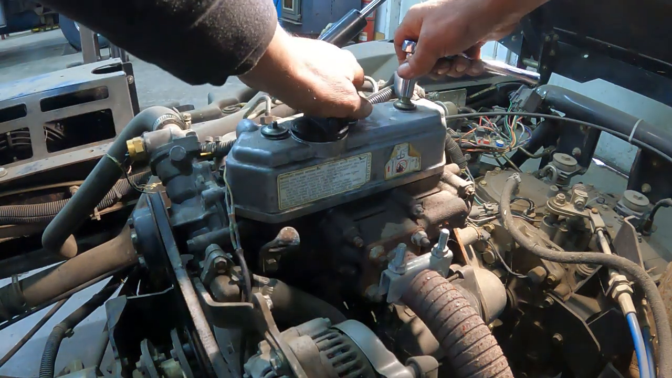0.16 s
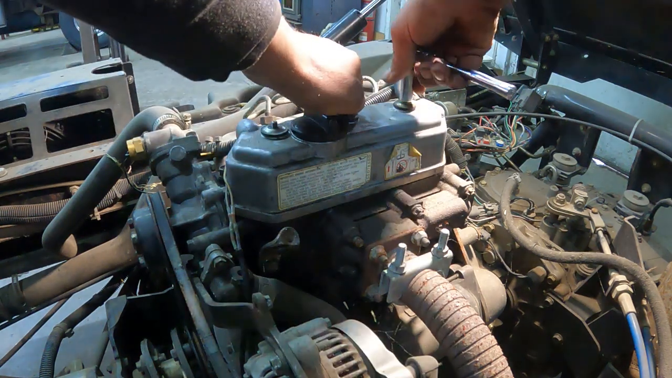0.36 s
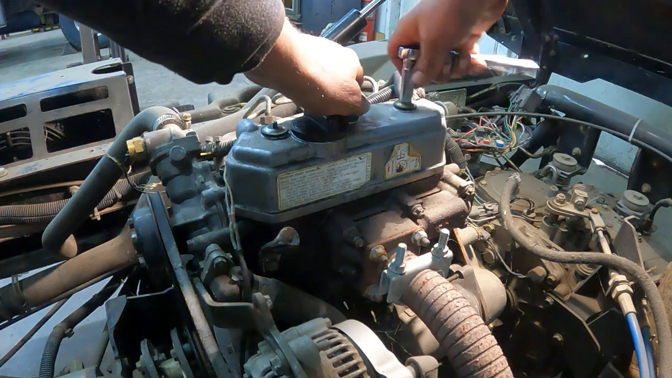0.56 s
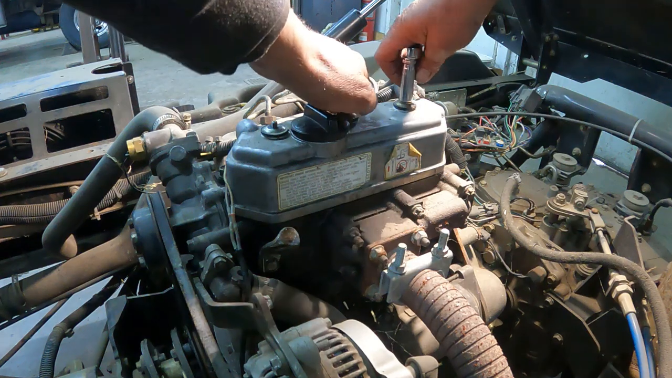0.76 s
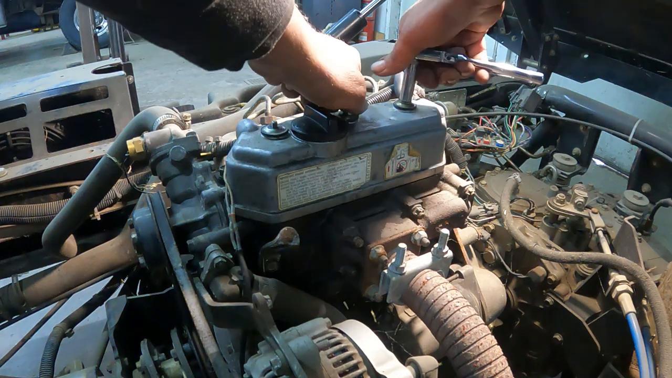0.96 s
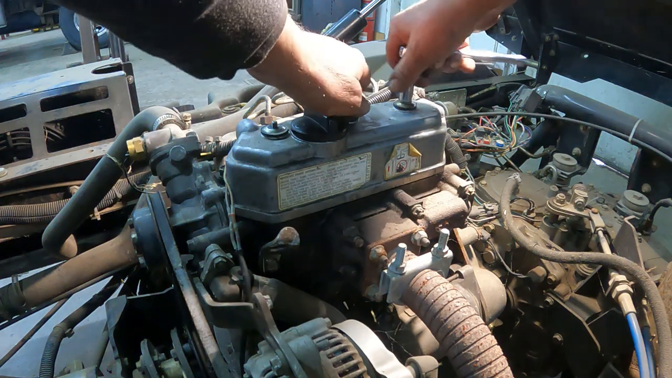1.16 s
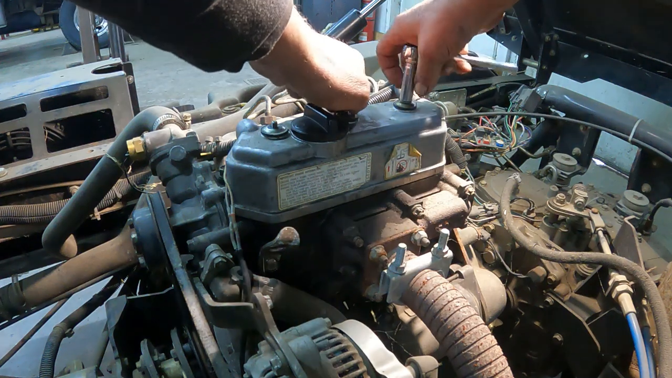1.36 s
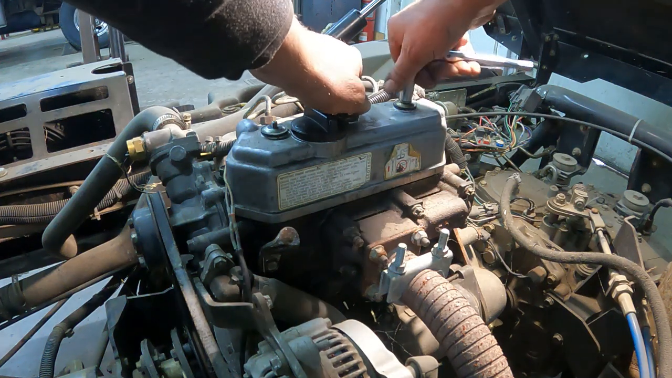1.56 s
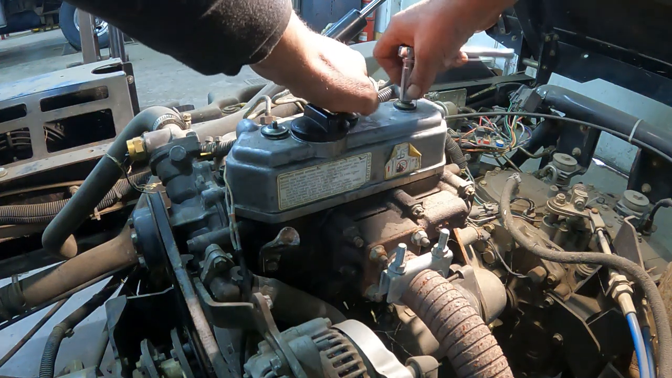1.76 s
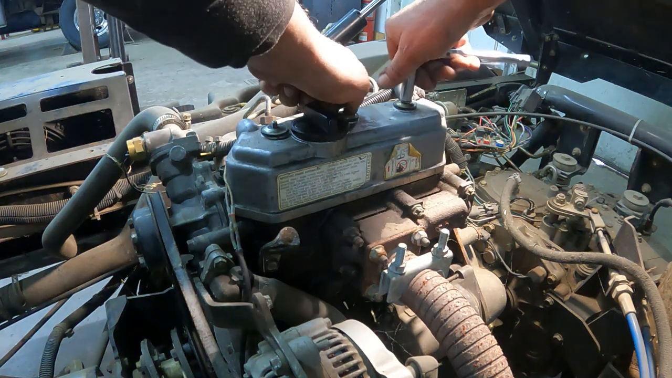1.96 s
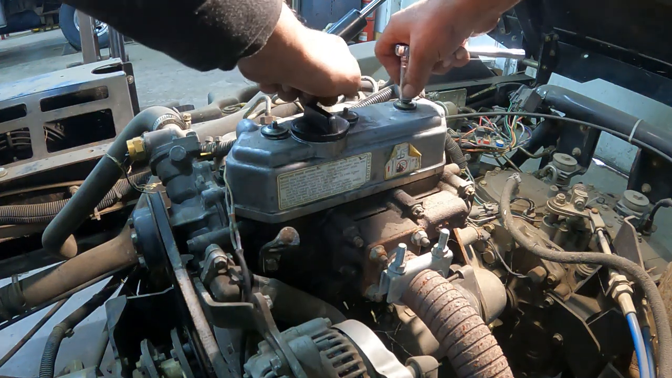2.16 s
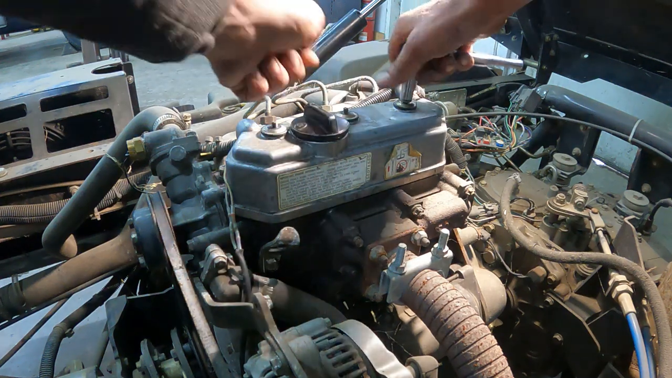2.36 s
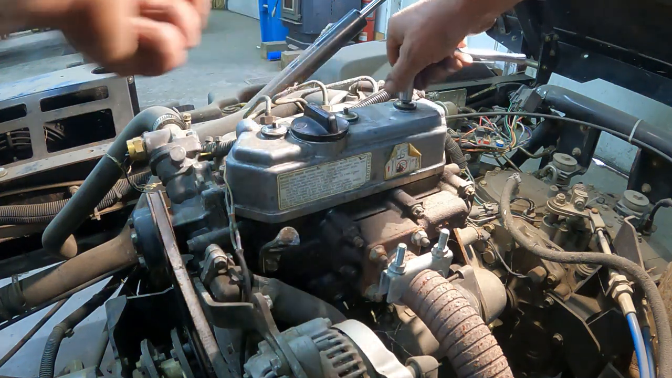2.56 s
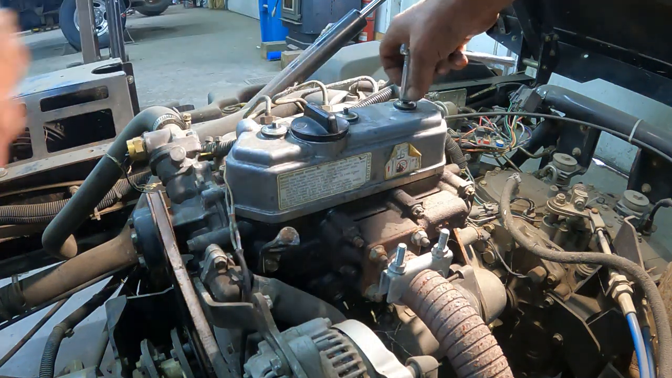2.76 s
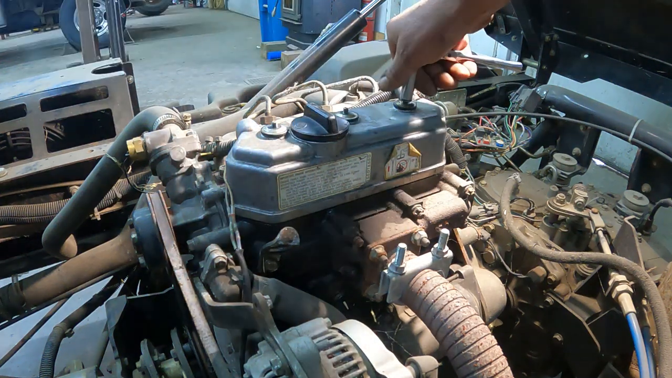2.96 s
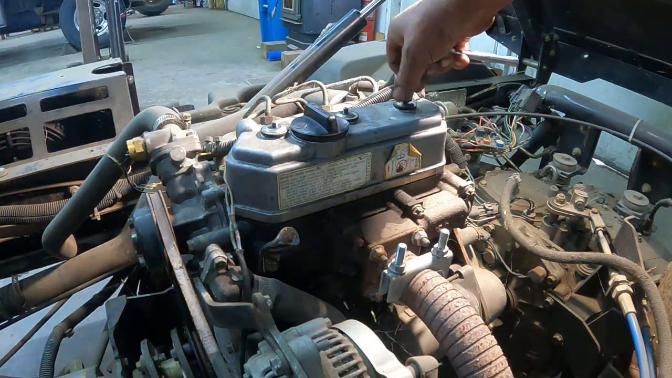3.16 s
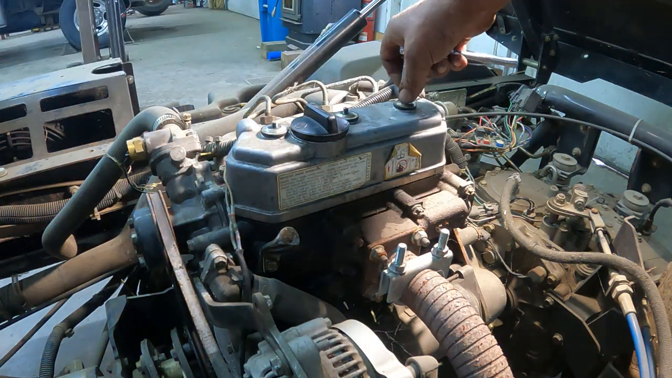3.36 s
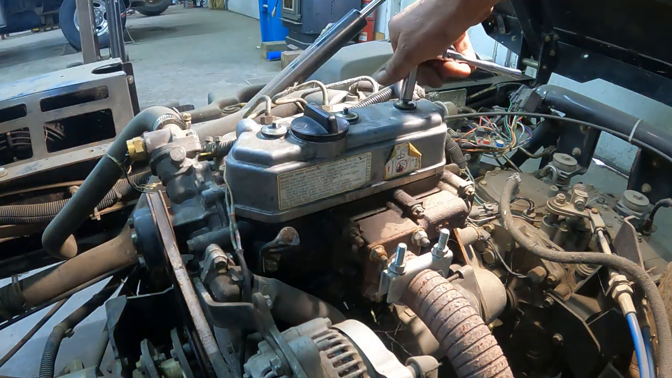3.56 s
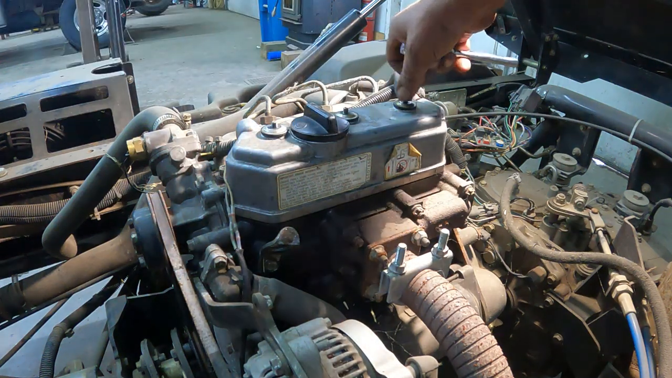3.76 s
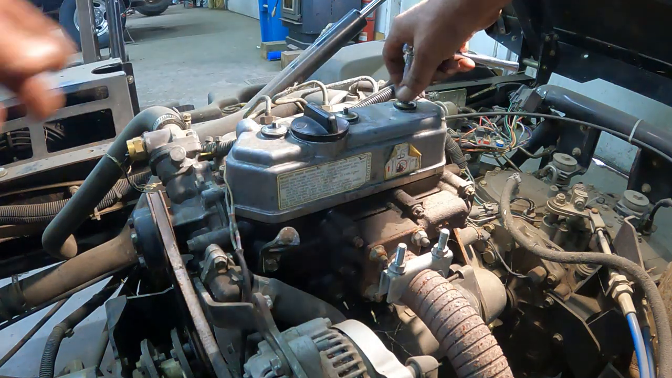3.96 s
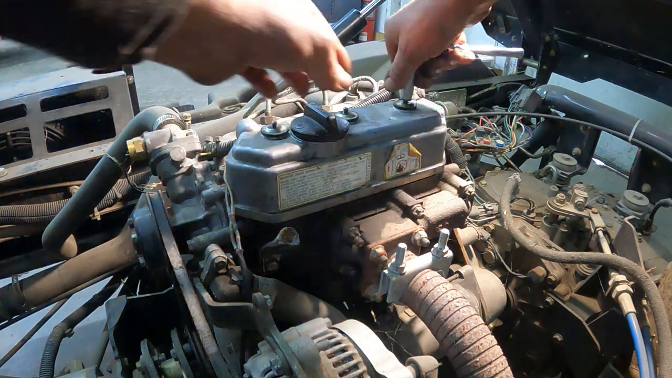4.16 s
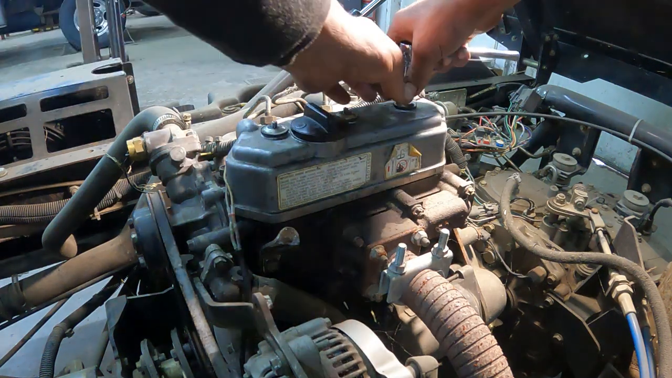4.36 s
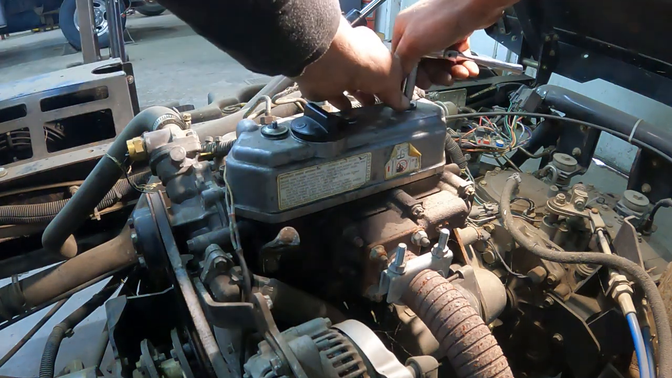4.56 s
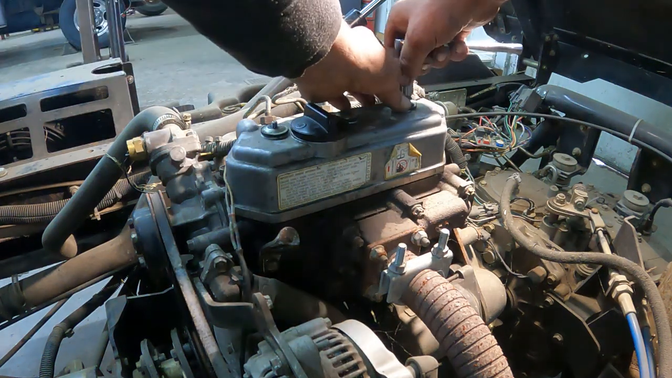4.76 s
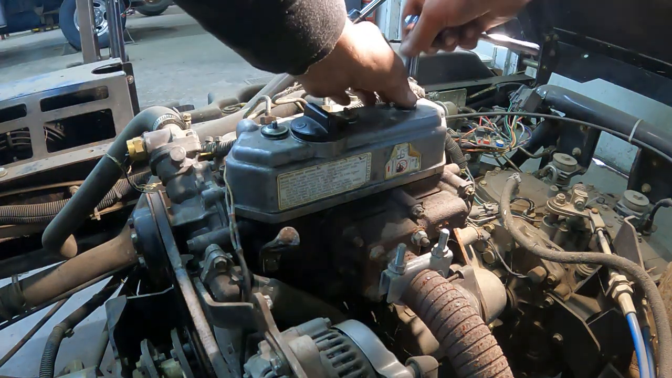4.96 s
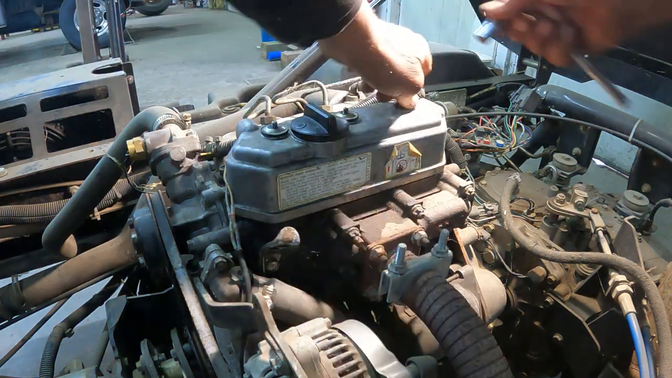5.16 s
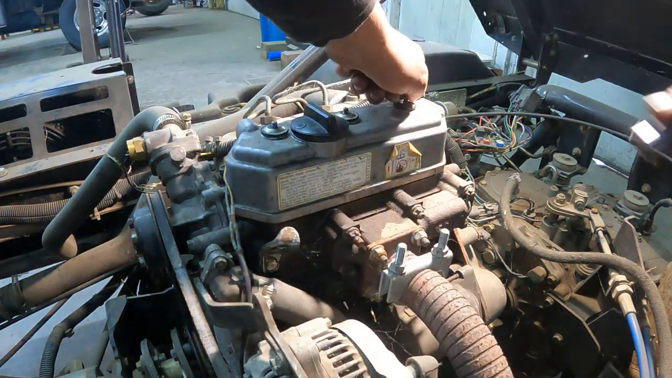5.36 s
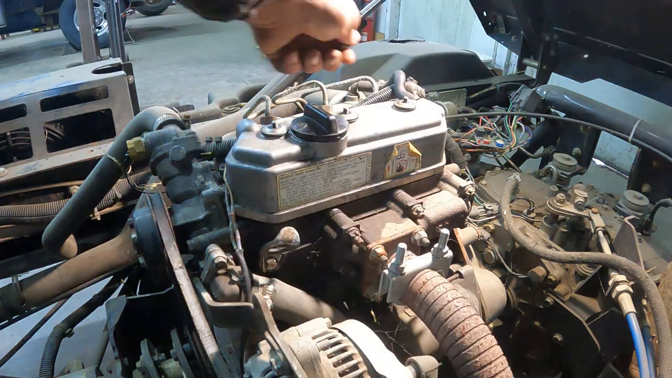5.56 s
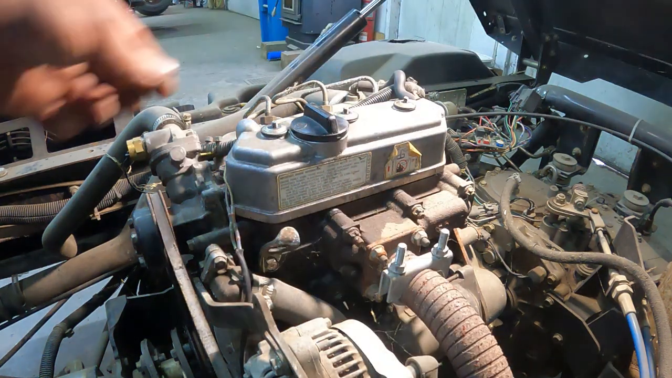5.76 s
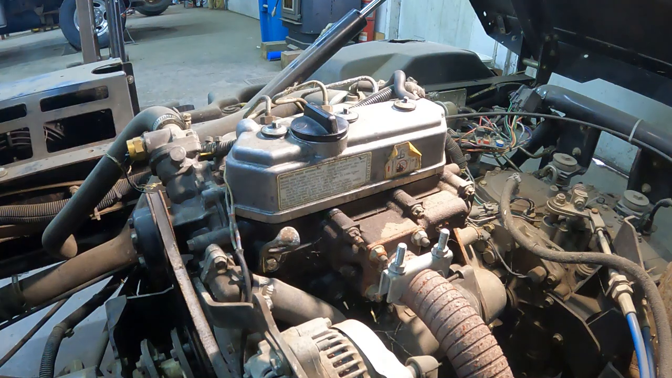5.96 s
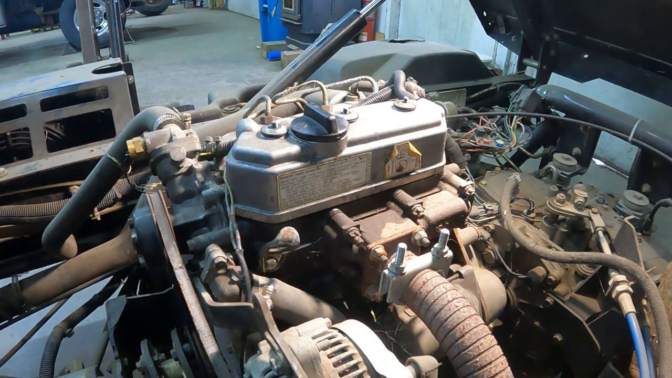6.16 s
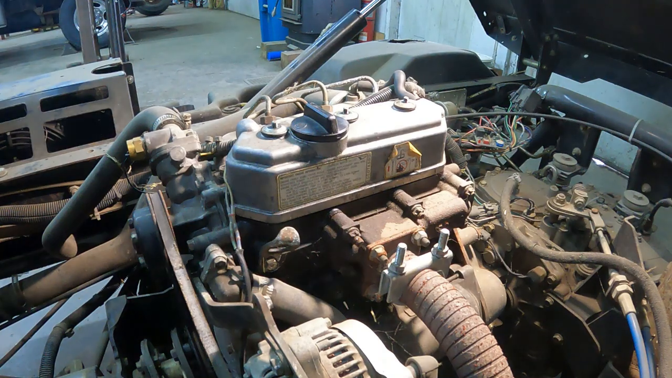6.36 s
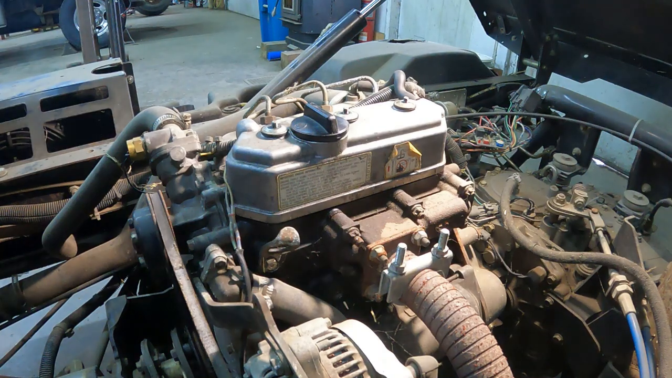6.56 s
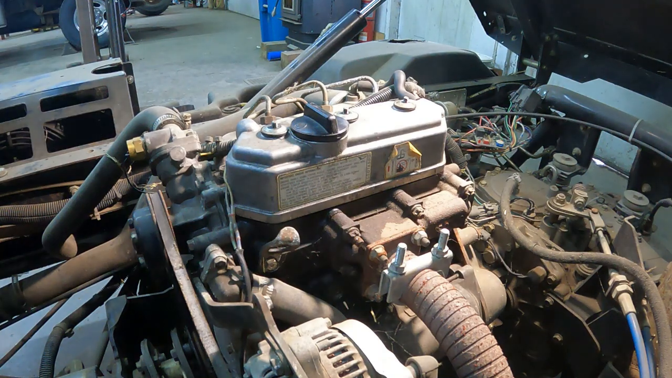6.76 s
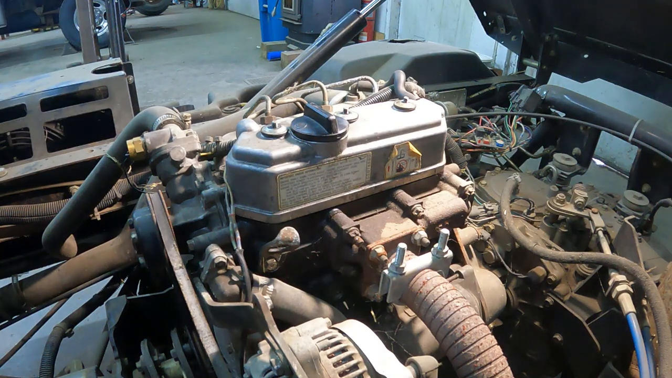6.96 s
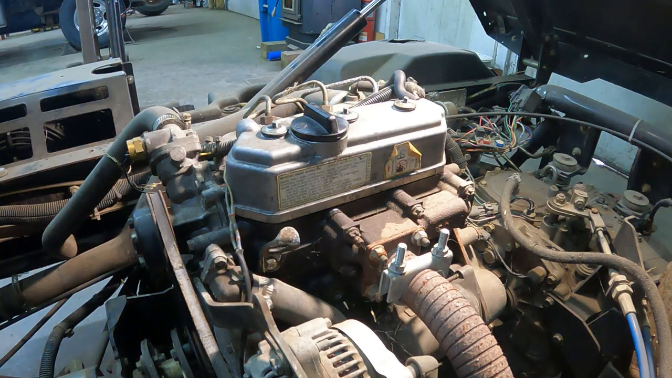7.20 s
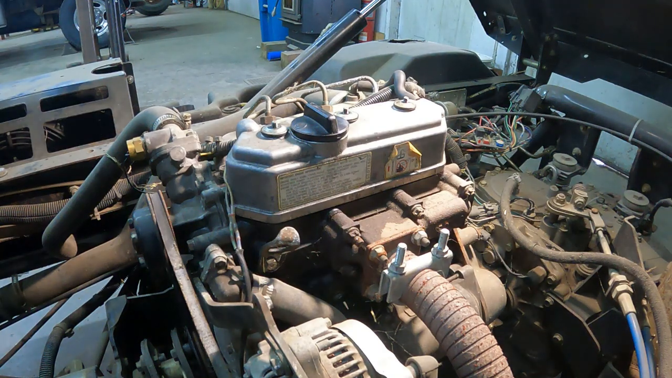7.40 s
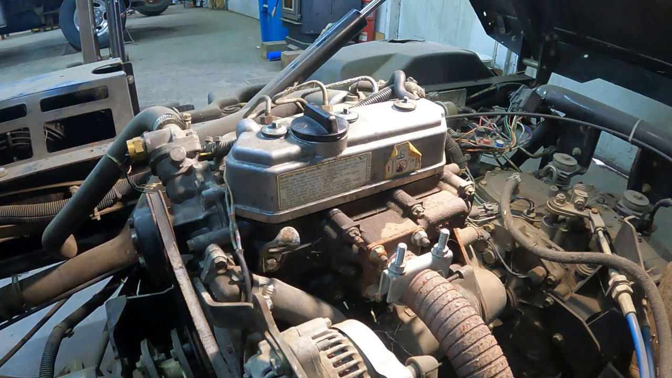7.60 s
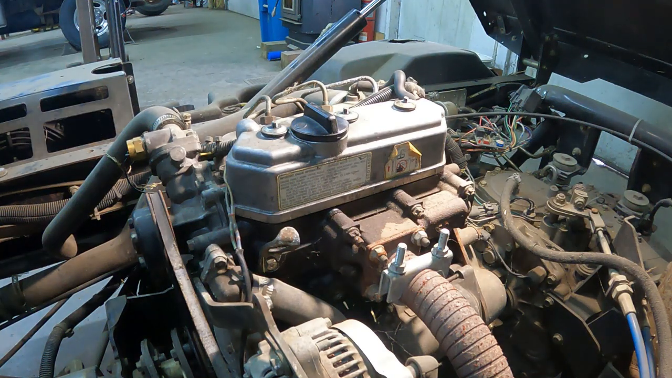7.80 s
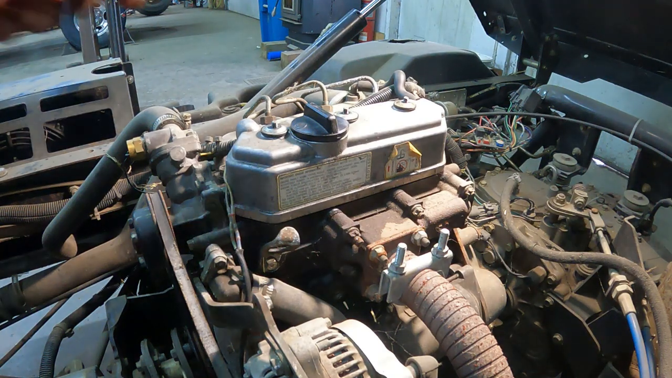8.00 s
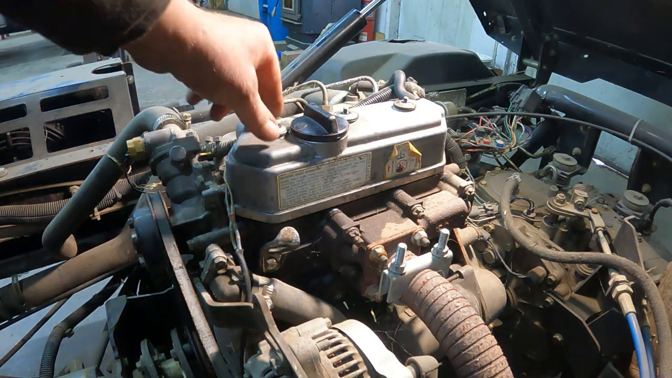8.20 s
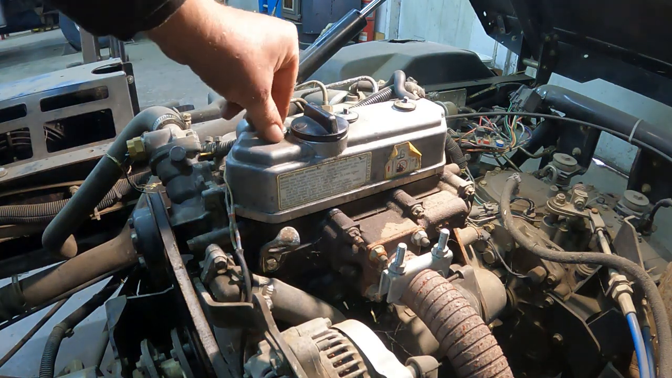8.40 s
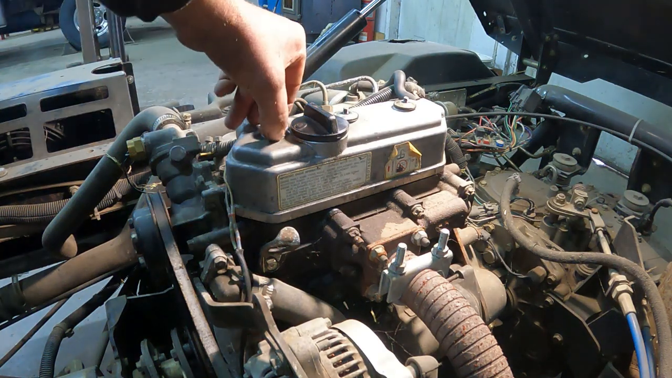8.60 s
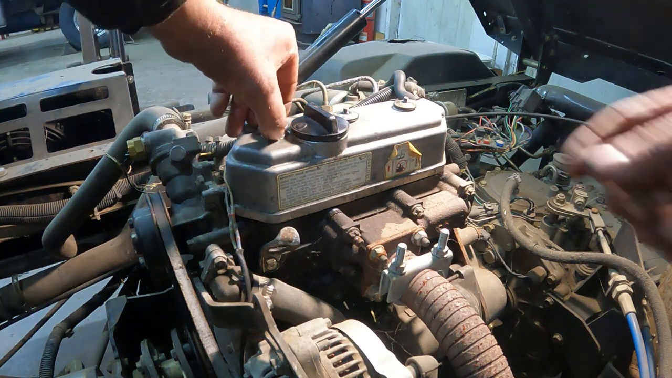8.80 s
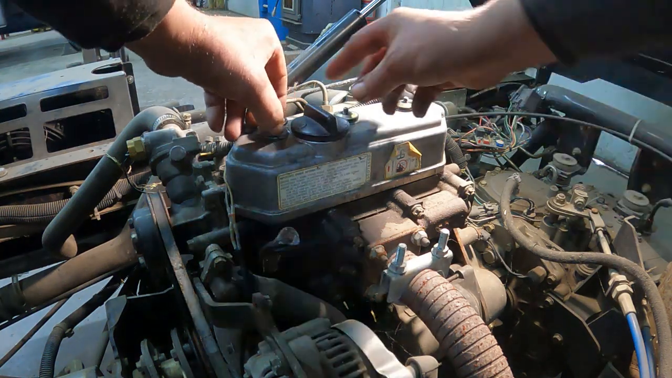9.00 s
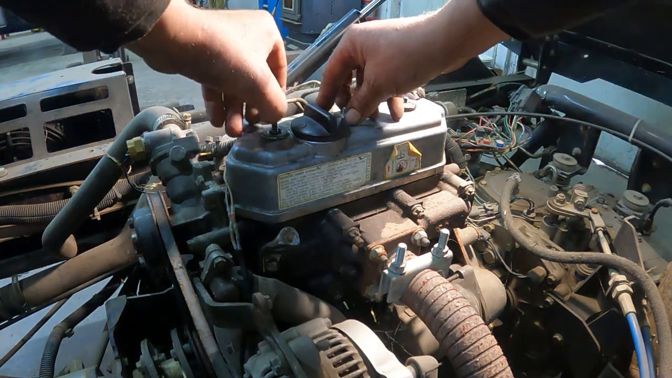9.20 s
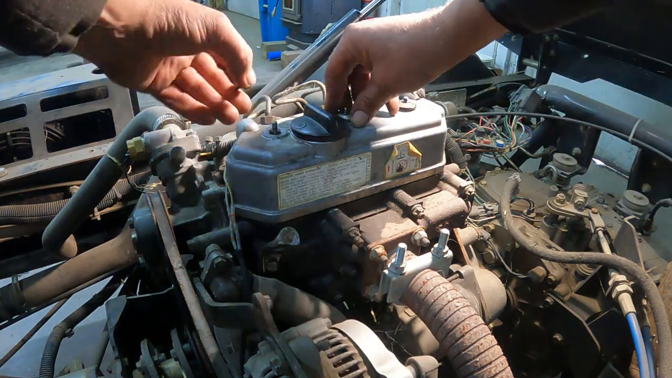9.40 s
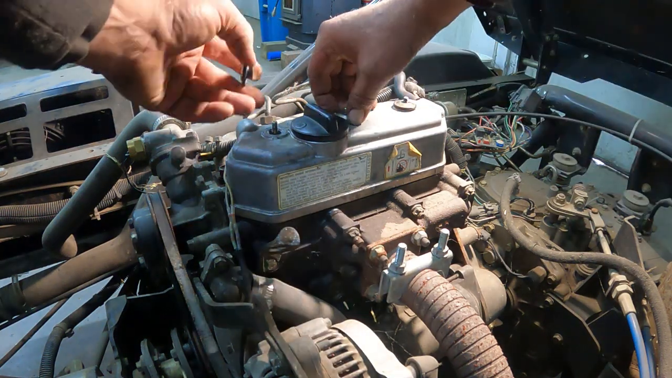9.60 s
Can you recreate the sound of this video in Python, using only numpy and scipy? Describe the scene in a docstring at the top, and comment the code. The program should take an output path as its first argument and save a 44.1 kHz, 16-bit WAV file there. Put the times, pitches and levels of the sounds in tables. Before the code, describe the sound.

A ratchet wrench clicks in quick dry bursts close by, then tools clank on metal and a hollow box thuds twice in a garage.

```python
"""Faint ticks of hands and parts come first, over a low wavering rumble and a thin hiss in a garage.
Then a ratchet wrench is swung back in quick strokes over a small engine; its pawl snaps tooth by tooth.
Further off, tools are laid on metal and a heavy thing bumps a hollow box twice. Snaps, ticks, scrapes and
rattles are shaped noise, steel and box ring as decaying sines, the background is filtered noise.
One close microphone feeds both channels."""
import sys
import numpy as np
from scipy import signal
from scipy.fft import rfft, irfft
from scipy.io import wavfile
from scipy.ndimage import uniform_filter1d

SR = 44100
rng = np.random.default_rng(int(sys.argv[2]) if len(sys.argv) > 2 else 0)


def output_pcm(signal):
    """Save a mono or channel-first signal as 16-bit PCM at the path in sys.argv[1].

    Samples are clipped to [-1, 1] before scaling.
    """
    pcm = np.clip(np.atleast_2d(signal).T, -1, 1) * 32767
    wavfile.write(sys.argv[1], SR, np.round(pcm).astype(np.int16))


N = 425124
T = np.arange(N) / SR  # s

# Spectra below have the columns: freq_hz [Hz], level_db [relative dB per Hz]; only their shape counts.
# Modes have: freq_hz [Hz], level_db [relative dB], t60_s [s]; each blow scatters pitch and level.

# low background: start_s [s], rumble_db [dB rms], hum_db [dB rms]
RUMBLE_LEVELS = [(0.0, -38, -35), (0.4, -49, -38.5), (0.85, -35.5, -45.5), (1.3, -43.5, -46.5),
                 (1.65, -38.5, -45.5), (2.1, -51.5, -50), (2.4, -44, -46.5), (2.9, -48, -50.5),
                 (3.4, -43, -48), (4.1, -46.5, -48), (4.62, -43.5, -49.5), (5.3, -49.5, -49),
                 (6.5, -55, -49), (7.3, -52, -51), (8.2, -57.5, -52), (9.64, -47.5, -51)]
# thin background: start_s [s], murmur_db [dB rms], hiss_db [dB rms], both before their flicker
AIR_LEVELS = [(0, -53, -69), (.6, -57.5, -65), (1.5, -61.5, -70), (3, -62, -70), (4, -61.5, -61),
              (5, -67, -72), (6.4, -60.5, -69.5), (7.3, -64.5, -72), (7.9, -64.5, -64.5), (8.3, -65, -70.5),
              (9, -64, -66.5), (9.64, -69, -70.5)]
# spectra of the low background: freq_hz [Hz], level_db [relative dB per Hz]
DEEP_COLOUR = [(6, -15.5), (13, 15.5), (26, 8), (33, 8.5), (39, 19), (45, 5.5), (52, 2.5), (70, -56), (400, -110)]
HUM_COLOUR = [(30, -46), (46, -0.5), (62, 4.5), (85, -2), (100, -7.5), (120, -17.5), (160, -48), (900, -110)]
DRONE_COLOUR = [(80, -27), (115, 6.5), (150, -4.5), (250, -9), (400, -27), (2000, -100.5)]
# spectra of the murmur, the hiss and its steady top: freq_hz [Hz], level_db [relative dB per Hz]
MURMUR_COLOUR = [(200, -17.5), (300, 5), (450, 2), (800, -1), (1250, -2), (1350, 2), (1450, -3.5),
                 (2500, -10.5), (4500, -20.5), (12000, -43.5)]
HISS_COLOUR = [(800, -32.5), (2000, 5.5), (4000, 5), (6500, 3.5), (7000, 7), (7500, 3), (9500, -0.5),
               (10500, -5), (15900, -38.5)]
FIZZ_COLOUR = [(3000, -20.5), (8000, -2.5), (11000, 0.5), (15500, 0.5), (15950, -39)]
# a faint dull rush that swells and fades: middle_s [s], half_width_s [s], level_db [dB rms at the middle]
RUSH_SWELL = (5.82, 0.38, -64)
# spectrum of the rush: freq_hz [Hz], level_db [relative dB per Hz]
RUSH_SPECTRUM = [(200, -43), (900, -1.5), (1500, 2), (2400, -3), (4000, -14), (10000, -52)]
DRONE_DB = -11  # dB relative to the hum, which the drone follows
FIZZ_DB = -75.5  # dB rms

# the stand rocks after the bump: start_s [s], end_s [s], pitch_hz [Hz], level_db [dB peak]
STAND_SWAY = (7.72, 8.05, 26.2, -36.5)
# decay of the garage: freq_hz [Hz], t60_s [s]
ROOM_DECAY = [(150, 1), (600, 1), (2000, 1), (6000, 0.56), (14000, .3)]

# short scrapes of fingers and parts: start_s [s], peak_db [dB], centre_hz [Hz], width_octaves [octaves]
SCRAPE_EVENTS = [(7.994, -44.5, 3130, 0.92), (8.074, -38.5, 2880, 1.1), (8.076, -39.5, 220.4, 1),
                 (8.403, -52, 6560, 1.1), (9.176, -50, 4000, 1.9), (9.239, -49.5, 694, 0.77),
                 (9.272, -57, 2600, 0.45), (9.438, -57.5, 4700, .1), (9.524, -53.5, 4540, 0.14),
                 (9.524, -47, 1500, 2.5)]
SCRAPE_S = 0.038  # length in s
# faint ticks of hands, nuts and sockets: start_s [s], peak_db [dB], centre_hz [Hz], width_octaves [octaves]
TICK_EVENTS = [(0.0429, -21, 4450, 0.89), (0.0842, -29.5, 1540, 1.84), (0.096, -33, 1480, 1.9),
               (0.2085, -35, 5360, 1.3), (0.313, -35.5, 2940, 1.3), (0.336, -37.5, 4000, 1.1),
               (0.554, -32.5, 1280, 2.3), (0.5762, -41, 3000, 1.7), (.67, -44, 1100, 0.46),
               (1.8434, -44, 5000, 1.3), (1.9867, -33, 3950, 1.8), (2.4264, -38.5, 5500, 1.2),
               (2.631, -40, 6100, 2.1), (3.74, -48, 6300, 1.1), (4.7545, -45.5, 6000, 1.2),
               (5.3263, -47, 1130, 1.1), (5.3414, -37, 4920, 1.3), (6.91, -45, 5700, 0.74),
               (7.192, -50, 2540, 0.71), (8.6885, -41.5, 8600, 0.28), (8.686, -36, 350, 0.97),
               (8.687, -44.5, 2470, 1.5), (8.735, -46, 8300, 0.47), (9.1963, -46, 4340, 0.72),
               (9.28, -52, 5940, 1.2)]
TICK_T60_S = 0.084

# blows of tools laid on metal, then of the box: time_s [s], peak_db [dB], held_s [s], rattle_t60_s [s]
SOCKET_BLOWS = [(3.549, -12.5, 0.017, 0.16), (3.569, -16, 0.011, 0.12), (3.626, -29.5, .004, 0.049)]
WRENCH_BLOWS = [(6.377, -15, 0.0034, 0.13), (6.382, -10, 0.021, 0.11)]
BOX_BLOWS = [(7.624, -12, 0.021, 0.072), (7.700, -4, 0.0059, 0.14)]
# ringing modes that the blows drive: freq_hz [Hz], level_db [relative dB], t60_s [s]
SOCKET_RING = [(287, -14, .28), (572, -7, .5), (846, -12, 0.25), (1024, -3, .24), (1327, -4, 0.17),
               (1590, 8.5, 0.066), (1765, -14, 0.23), (1997, -13, 0.46), (2350, -16, .15), (2658, -4, 0.12),
               (3225, -10, .15), (5443, -12, .06), (5970, -8, 0.04)]
WRENCH_RING = [(295, -36.5, 0.28), (428, -22, 1.4), (573, -10, 0.8), (600, -15, 0.5), (615, -17, 0.3),
               (1027, 5, 0.19), (1482, -2.5, 0.17), (1654, 3, 0.12), (1794, 12, 0.052), (2210, -0.5, 0.094),
               (2550, -12, .15), (2860, -9.5, 0.29), (3200, -3, 0.14), (3800, -18, .2), (3850, 3, 0.14),
               (4745, 2, 0.15), (6260, -24, .25)]
BOX_RING = [(171, -12, 0.17), (209, -19.5, 0.47), (284, -15.5, 0.29), (351, -16, 0.26), (414, 0, 0.13),
            (528, -15, 0.29), (586, -9.5, 0.16), (710, -5.5, 0.24), (792, -2.5, 0.064), (890, 2, 0.17),
            (1240, -10, 0.27), (1398, -7.5, 0.13), (1712, -30, .2), (2400, -24.5, .08)]
# spectra of the rattling contact: freq_hz [Hz], level_db [relative dB per Hz]
SOCKET_RATTLE = [(120, -59), (200, -33.5), (1000, -1.5), (1230, -14), (1530, -6), (2250, -14.5), (2610, -8),
                 (4120, -19.5), (5520, -14), (16000, -34.5)]
WRENCH_RATTLE = [(120, -55), (200, -31), (601, -11), (883, -12.5), (1020, -15), (1160, -11), (2090, -7.5),
                 (3490, -17.5), (3970, -9), (16000, -30.5)]
BOX_RATTLE = [(59, -64), (130, -41.5), (170, -19), (260, -14.5), (383, -3), (630, -2), (1100, -11),
              (1380, -11), (2090, -18), (2410, -17), (2620, -23), (5300, -34.5), (14000, -61.5)]

# back swings of the handle: first_tooth_s [s], last_tooth_s [s], teeth [count], peak_db [dB at top speed,
# before scatter], ring_db [relative dB, before scatter], start_speed [share of top], speeds_up_at [share
# of the swing], fastest_at [share of the swing], end_speed [share of top]
BACK_SWINGS = [(0.9246, 1.024, 5, -17.5, -10, .75, .01, .22, .44),
               (1.2314, 1.3883, 16, -14.5, -2, .47, .12, .26, .18),
               (1.6713, 1.7922, 16, -14.5, -8, .31, .09, .49, .21),
               (2.119, 2.2392, 16, -14, -6, .49, .41, .58, .73),
               (2.652, 2.7367, 13, -14, -5, .48, .4, .86, .39),
               (3.1879, 3.2922, 12, -15, -6, .43, .14, .85, .51),
               (3.7943, 3.9005, 13, -14.5, -3, .42, .42, .57, .74),
               (4.2681, 4.3368, 12, -13, -3, .72, .69, .73, .11),
               (4.774, 4.8582, 11, -12, -2, .52, .45, .82, .51)]
# teeth as the hand hesitates before or after a swing: time_s [s], peak_db [dB], ring_db [relative dB]
SINGLE_TEETH = [(0.4104, -17.5, -5), (0.449, -18.5, -1.5), (1.4969, -23, -25), (2.096, -18.5, -18),
                (2.2536, -19.5, -12), (2.763, -19, -6), (3.1188, -18.5, -8.5), (3.3488, -16.5, -3),
                (3.7503, -17.5, -5.5), (3.7855, -16, -17), (3.9638, -19.5, -10), (4.248, -18, -19),
                (4.8854, -12.5, 12)]
# spectrum of the pawl's snap: freq_hz [Hz], level_db [relative dB per Hz]
SNAP_COLOUR = [(250, -32.5), (400, -21), (1040, -23), (1500, -27), (2300, -14), (3200, -11), (4900, -10.5),
               (7000, -6), (9200, -7.5), (10300, -13), (12200, -5), (15500, -9), (15950, -34), (17000, -52)]
# modes of the steel ratchet head: freq_hz [Hz], level_db [relative dB], t60_s [s]
HEAD_MODES = [(7630, -24, 0.012), (8126, 1, 0.013), (8290, 1.5, 0.025), (8430, -10, 0.0099),
              (12290, 0, 0.0085), (12700, -8, .007), (15400, -6, 0.011), (4070, -18, 0.028),
              (3090, -22.5, 0.035), (3310, -16, 0.036), (7040, -27.5, 0.032)]
TOOTH_SCATTER_DB, RING_SCATTER_DB = 1.6, 2.5  # standard deviation from tooth to tooth
SLOW_DB = -3.5  # change of a tooth's level towards standstill

TOP_HZ = 16900  # upper limit of the recorder


def amp(db):
    """Converts dB to a linear factor."""
    return 10 ** (np.asarray(db, float) / 20)


def fade(t60, length):
    """Exponential decay that is 60 dB down after t60 seconds (2 ms at least)."""
    return np.exp(-np.log(1000) * np.arange(length) / SR / max(t60, .002))


def colour(points, size=1024):
    """Causal minimum-phase filter response with the given spectrum, unit energy."""
    hz, db = np.transpose(points)
    grid_hz = np.arange(size + 1) * SR / 2 / size + 1
    log_gain = np.log(amp(np.interp(np.log(grid_hz), np.log(hz), db)))
    # folding the cepstrum onto positive times makes the response causal
    cepstrum = irfft(log_gain)
    cepstrum[1:size] *= 2
    cepstrum[size + 1:] = 0
    response = irfft(np.exp(rfft(cepstrum)))[:size]
    response *= np.hanning(2 * size)[size:]
    return response / np.sqrt(np.sum(response ** 2))


def band_of(hz, octaves):
    """Response of a hump in the spectrum, its points spaced by the given octaves."""
    hump_db = (-45.5, -16, -1, 1.5, -13.5, -43.5, -32)
    return colour([(hz * 2 ** (k * octaves), db) for k, db in zip(range(-3, 4), hump_db)])


def peak(x, db):
    """Scales x to a peak level in dB."""
    return x * amp(db) / np.abs(x).max()


def add(out, s, x):
    """Mixes x into out from second s on."""
    i = int(s * SR)
    out[i:i + len(x)] += x[:N - i]


def curves(table):
    """Draws each column of a table as a line over the whole scene."""
    s, *columns = np.transpose(table)
    return [np.interp(T, s, column) for column in columns]


def walk(rate):
    """Random levels held 1 / rate s and slewed twice; spread near 1."""
    held = int(SR / rate)
    steps = np.repeat(rng.standard_normal(N // held + 1), held)
    return 1.3 * uniform_filter1d(uniform_filter1d(steps, held), held)[:N]


def noise(points, size=1024):
    """Steady noise of a spectrum, rms 1."""
    x = signal.fftconvolve(rng.standard_normal(N), colour(points, size=size))[:N]
    return x / x.std()


def ring(modes, length, scatter_db):
    """One blow's ring: every mode has its own strength, sign and slight detuning."""
    out, t = np.zeros(length), np.arange(length) / SR
    chances = rng.standard_normal((len(modes), 2))
    for (hz, db, t60), (a, b) in zip(modes, chances):
        wave = np.sin(2 * np.pi * hz * (1 + 0.005 * b) * t)
        out += amp(db + scatter_db * a) * np.sign(b) * wave * fade(t60, length)
    return out


def air():
    """Noise bands of the garage: rumble, hum and drone waver slowly; murmur and hiss flicker a little."""
    deep_db, hum_db = curves(RUMBLE_LEVELS)
    murmur_db, hiss_db = curves(AIR_LEVELS)
    murmur_db = murmur_db + .8 * walk(12)
    hiss_db = hiss_db + .6 * walk(12)
    deep = amp(deep_db) * noise(DEEP_COLOUR, size=16384)
    hum = amp(hum_db) * noise(HUM_COLOUR, size=16384)
    drone = amp(hum_db + DRONE_DB) * noise(DRONE_COLOUR, size=4096)
    murmur = amp(murmur_db) * noise(MURMUR_COLOUR, size=4096)
    hiss = amp(hiss_db) * noise(HISS_COLOUR)
    fizz = amp(FIZZ_DB) * noise(FIZZ_COLOUR)
    middle, half_width, rush_db = RUSH_SWELL
    swell = np.exp(-((T - middle) / half_width) ** 2 / 2)
    rush = amp(rush_db) * swell * noise(RUSH_SPECTRUM)
    return deep + hum + drone + murmur + hiss + fizz + rush


def sway():
    """The stand's deep slow rocking, a sine that builds over a few cycles, holds and dies away."""
    start, end, hz, db = STAND_SWAY
    build = 1 - np.exp(-np.maximum(T - start, 0) / 0.11)
    die = np.exp(-np.maximum(T - end, 0) / 0.37)
    return amp(db) * build * die * np.sin(2 * np.pi * hz * T)


def room(dry, delay_s=0.0022):
    """Diffuse tail of the garage: half-octave bands of noise, the treble dying first."""
    size, tail = SR, 0
    hz, t60 = np.transpose(ROOM_DECAY)
    for centre in 70 * 2 ** np.arange(0, 8, .5):
        edges = [centre / 2 ** .25, centre * 2 ** .25]
        band = signal.butter(1, edges, "band", fs=SR, output="sos")
        band_t60 = np.interp(np.log(centre), np.log(hz), t60)
        tail = tail + signal.sosfilt(band, rng.standard_normal(size)) * fade(band_t60, size)
    tail *= 1 - np.exp(-np.arange(size) / SR / delay_s)  # the tail builds up gradually
    return signal.fftconvolve(dry, tail / np.sqrt(np.sum(tail ** 2)))[:N]


def scrapes(size=4000):
    """Rubs of banded noise that start softly, catch unevenly and stop."""
    out = np.zeros(N)
    for s, db, hz, octaves in SCRAPE_EVENTS:
        share = np.clip(np.arange(size) / SR / SCRAPE_S, 0, 1)
        catch = amp(3.0 * np.repeat(rng.standard_normal(size // 80), 80))
        stroke = np.sqrt(np.sin(np.pi * share ** 0.89).clip(0))
        rub = rng.standard_normal(size) * catch * stroke
        add(out, s, peak(signal.fftconvolve(rub, band_of(hz, octaves)), db))
    return out


def ticks(size=8000):
    """Small noise bursts with a sharp start, each in its own band."""
    out = np.zeros(N)
    for s, db, hz, octaves in TICK_EVENTS:
        shape = fade(TICK_T60_S, size) + 3.6 * fade(TICK_T60_S / 6, size)
        burst = rng.standard_normal(size) * shape
        add(out, s, peak(signal.fftconvolve(burst, band_of(hz, octaves))[:size], db))
    return out


def knocks(blows, modes, crack, ring_db, wet_db, bright_s, size=40000):
    """A blow rattles unevenly for some hundredths of a second, is heard directly and drives the modes.
    Rows: the sound at the microphone, and the share that fills the room, where the ring counts less."""
    out, short = np.zeros((2, N)), size // 4
    for s, db, held, t60 in blows:
        lumps = amp(2.66 * np.repeat(rng.standard_normal(short // 100), 100))
        shape = np.concatenate([np.ones(int(held * SR)), fade(t60, short)])[:short]
        shape = shape * np.minimum(np.arange(short) / 20, 1)
        rattle = rng.standard_normal(short) * lumps * shape
        # the first contact is a clean blow; the rattle roughens the ring
        drive = 0.71 * rattle / np.sqrt(np.sum(rattle ** 2))
        drive[0] += 1
        body = peak(signal.fftconvolve(drive, ring(modes, size, 1.1))[:size], ring_db)
        direct = np.pad(signal.fftconvolve(rattle, colour(crack)), (0, size))[:size]
        # later contacts are softer, so the treble leaves first
        dull = signal.lfilter(*signal.butter(1, 1800, fs=SR), direct)
        direct = peak(dull + (direct - dull) * fade(bright_s, size), 0)
        gain = amp(db) / np.abs(direct + body).max()
        add(out[0], s - .0005, gain * (direct + body))
        add(out[1], s - .0005, gain * amp(wet_db) * (direct + 0.26 * body))
    return out


def teeth():
    """Rows (s, peak dB, ring dB): a tooth drops at every even step of angle, harder when the handle is fast."""
    rows, share = list(SINGLE_TEETH), np.linspace(0, 1, num=400)
    for first, last, count, db, ring_db, start, speeds_up, fastest, end in BACK_SWINGS:
        corners = [0, min(speeds_up, fastest), fastest, 1]
        speed = np.interp(share, corners, [start, start, 1, end])
        angle = np.cumsum(speed) - start
        at = np.interp(np.linspace(0, angle[-1], num=round(count)), angle, share)
        level_chance, ring_chance = rng.standard_normal((len(at), 2)).T
        slowness = 1 - np.interp(at, share, speed)
        rows += zip(first + (last - first) * at,
                    db + SLOW_DB * slowness + TOOTH_SCATTER_DB * level_chance,
                    ring_db + RING_SCATTER_DB * ring_chance)
    return rows


def ratchet(snap_s=0.012, tip_db=6.0, tip_s=0.0028, buzz_db=-13, buzz_s=0.12, ring_db=4, rise_s=.001):
    """Each tooth: a sharp snap, the steel head ringing, and a short buzz of socket, nut and cover."""
    out, snap, size = np.zeros(N), colour(SNAP_COLOUR, size=256), 6000
    rise = np.minimum(np.arange(size) / SR / rise_s, 1)
    tip = amp(tip_db) * fade(tip_s, size)
    buzz = amp(buzz_db) * fade(buzz_s, size)
    shape = (tip + fade(snap_s, size) + buzz) * rise
    for s, db, share_db in teeth():
        crack = signal.fftconvolve(rng.standard_normal(size) * shape, snap)[:size]
        # the pawl chatters for a moment, so the ring swells before it fades
        push = rng.standard_normal(100) * fade(0.0043, 100)
        head = signal.fftconvolve(ring(HEAD_MODES, size, 2.1), push)[:size]
        add(out, s, peak(peak(crack, 0) + peak(head, ring_db + share_db), db))
    return out


def scene():
    """Close ratchet, ticks and scrapes, knocks further off, the room around them, and the background."""
    near = ratchet() + ticks() + scrapes()
    # the knocks happen further off, so more of the room is heard on them
    socket = knocks(SOCKET_BLOWS, SOCKET_RING, SOCKET_RATTLE, ring_db=-5, wet_db=-13, bright_s=0.81)
    wrench = knocks(WRENCH_BLOWS, WRENCH_RING, WRENCH_RATTLE, ring_db=-1, wet_db=-12.5, bright_s=0.21)
    box = knocks(BOX_BLOWS, BOX_RING, BOX_RATTLE, ring_db=-8.5, wet_db=-13.5, bright_s=0.13)
    far, wet = socket + wrench + box
    mono = near + far + room(amp(-24.5) * near + wet) + sway() + air()
    return np.array([mono, mono])


def record(dry):
    """The recorder cuts the top with a steep low-pass."""
    return signal.sosfilt(signal.ellip(12, .2, 80, TOP_HZ, fs=SR, output="sos"), dry)


dry = scene()
out = record(dry)
output_pcm(out)
```